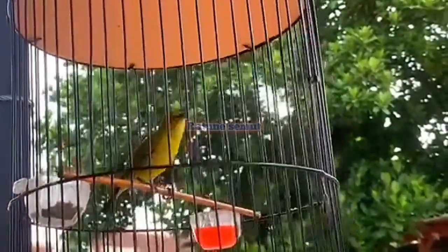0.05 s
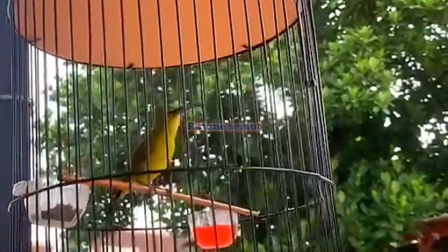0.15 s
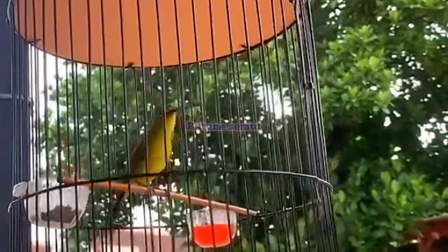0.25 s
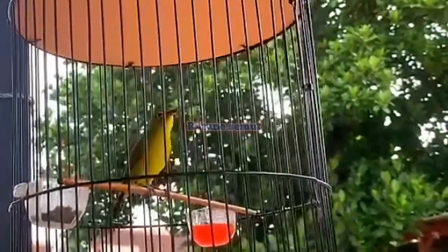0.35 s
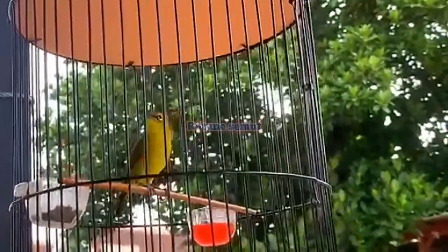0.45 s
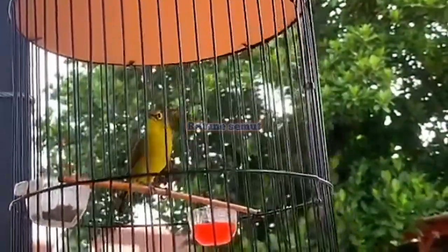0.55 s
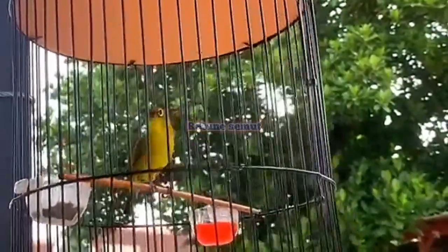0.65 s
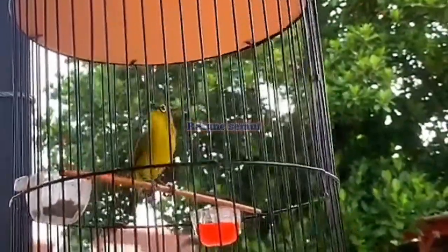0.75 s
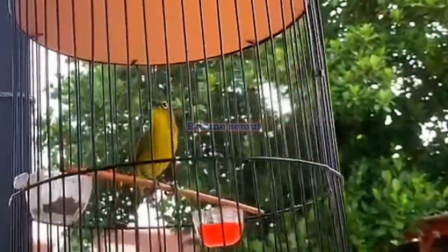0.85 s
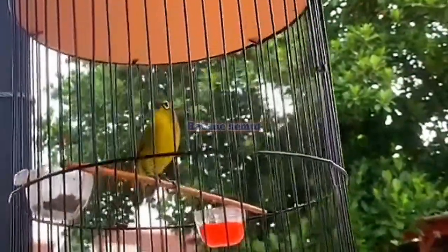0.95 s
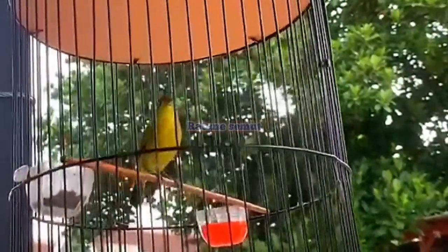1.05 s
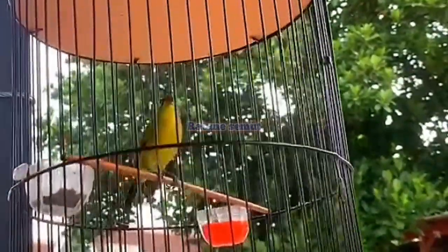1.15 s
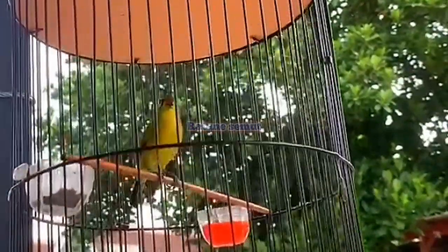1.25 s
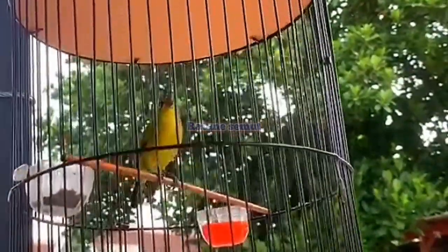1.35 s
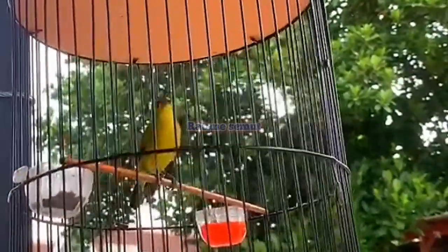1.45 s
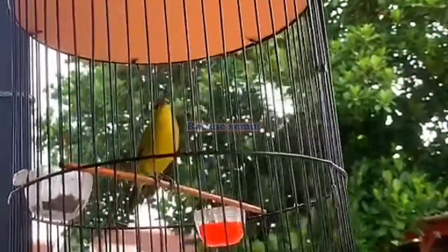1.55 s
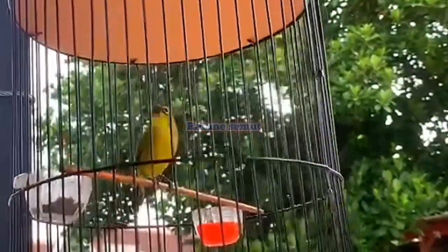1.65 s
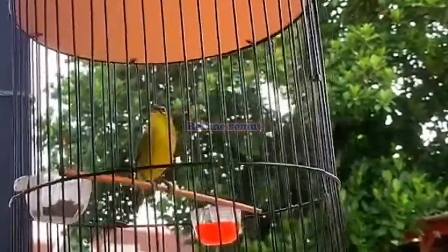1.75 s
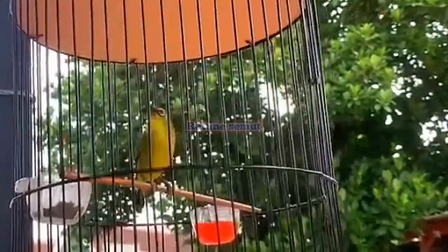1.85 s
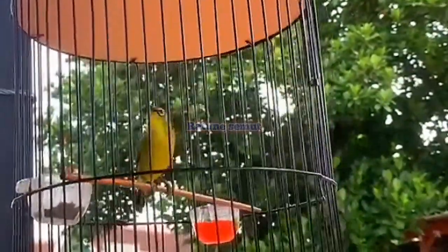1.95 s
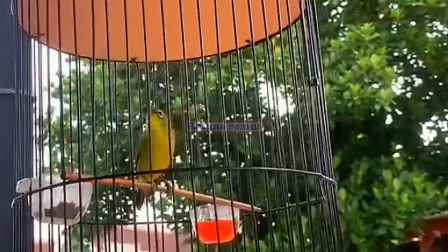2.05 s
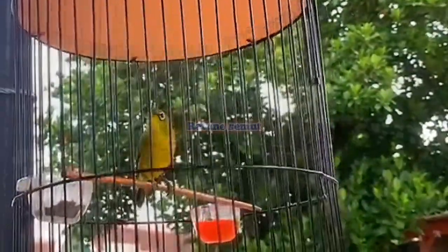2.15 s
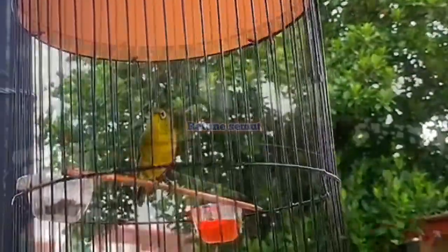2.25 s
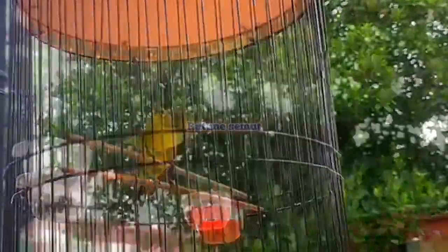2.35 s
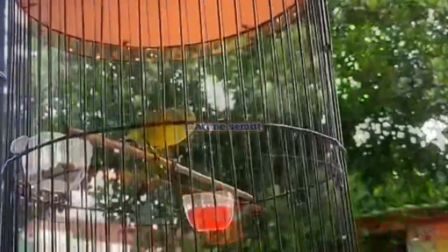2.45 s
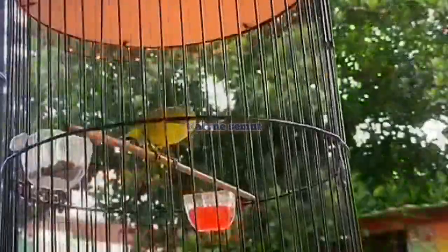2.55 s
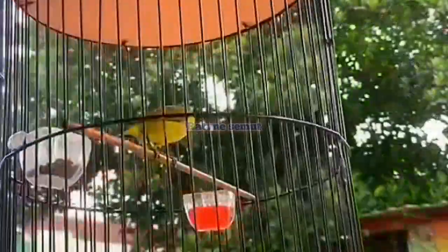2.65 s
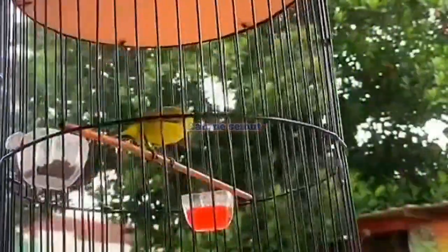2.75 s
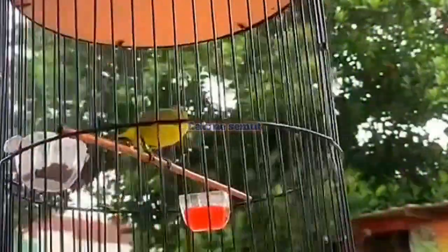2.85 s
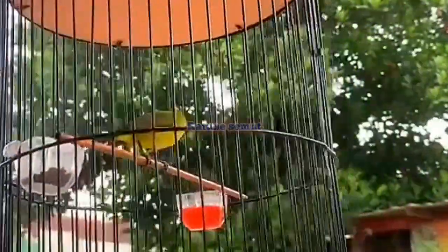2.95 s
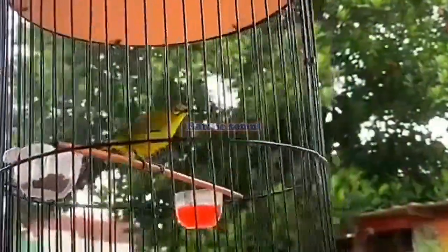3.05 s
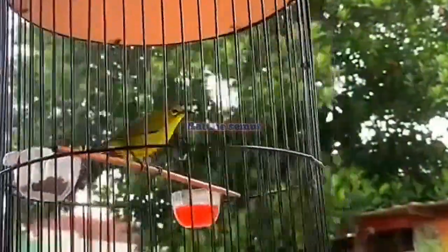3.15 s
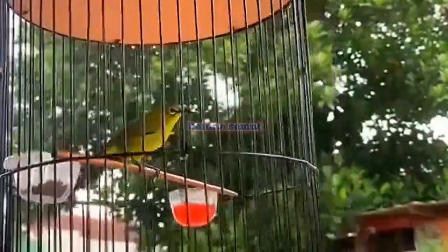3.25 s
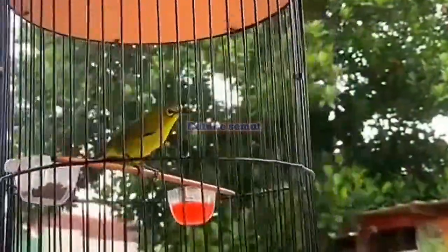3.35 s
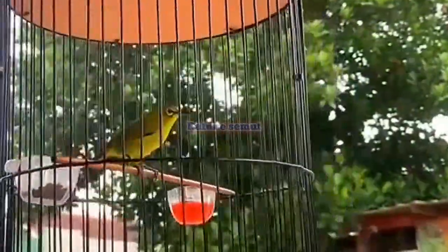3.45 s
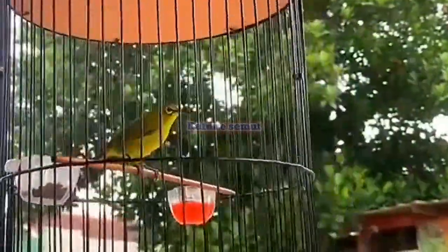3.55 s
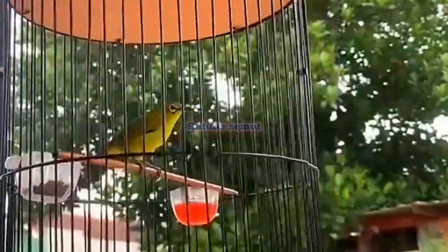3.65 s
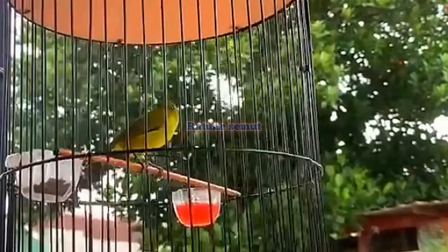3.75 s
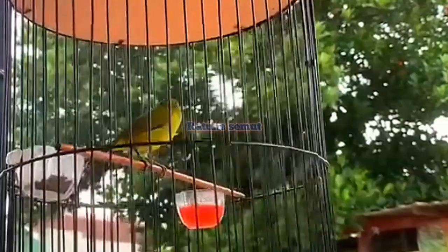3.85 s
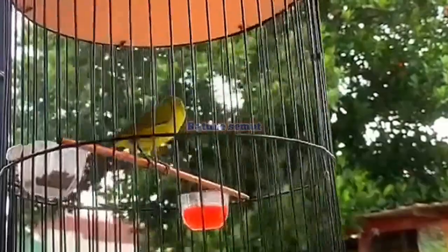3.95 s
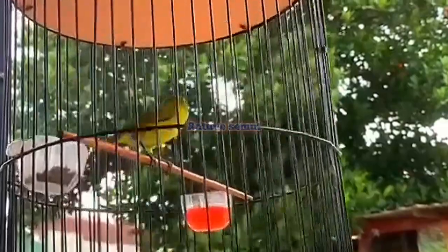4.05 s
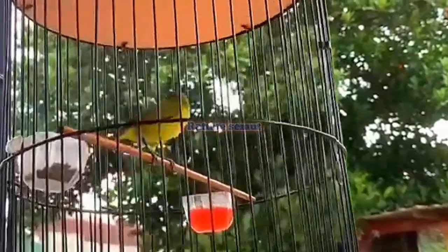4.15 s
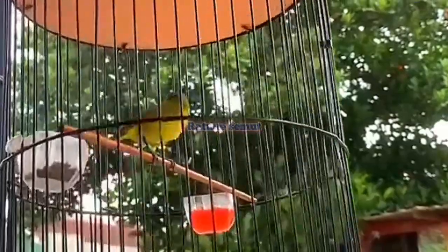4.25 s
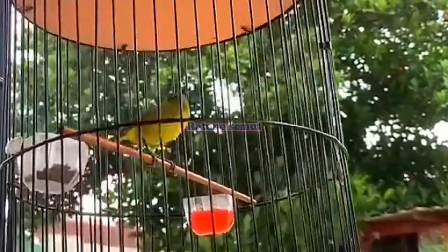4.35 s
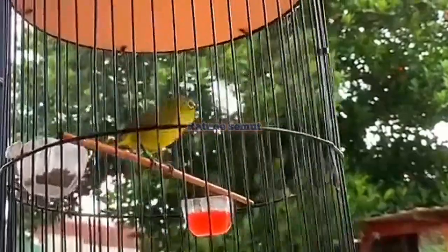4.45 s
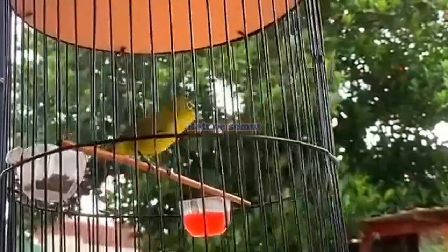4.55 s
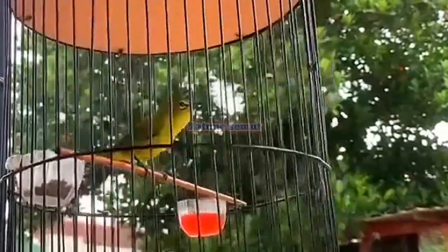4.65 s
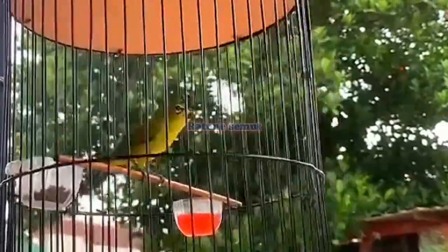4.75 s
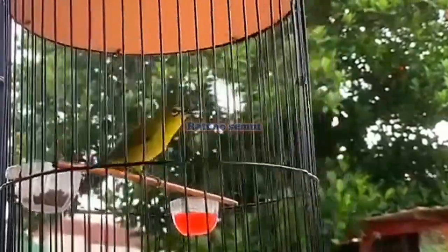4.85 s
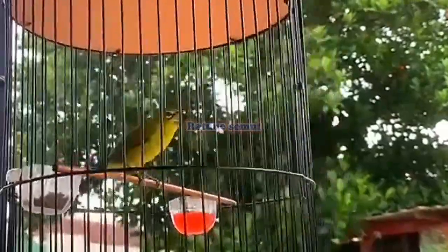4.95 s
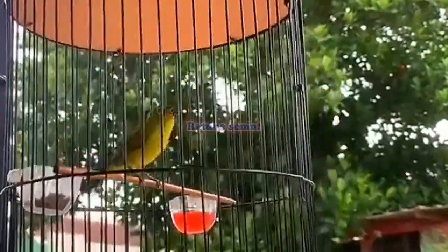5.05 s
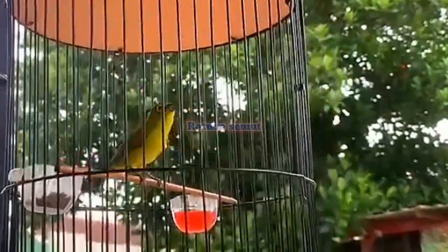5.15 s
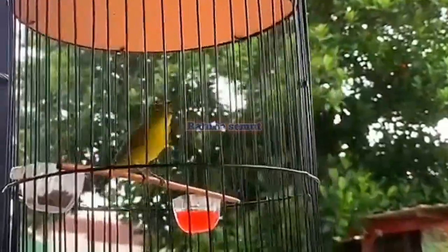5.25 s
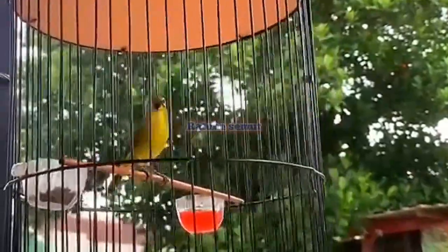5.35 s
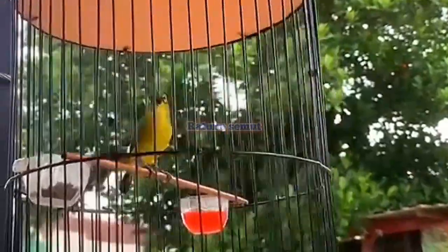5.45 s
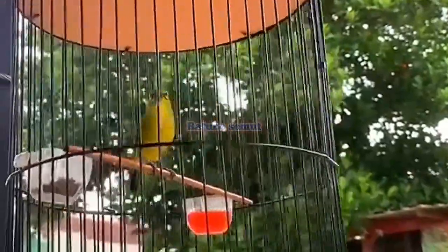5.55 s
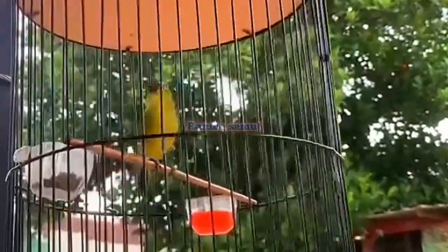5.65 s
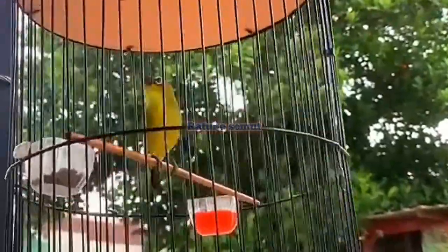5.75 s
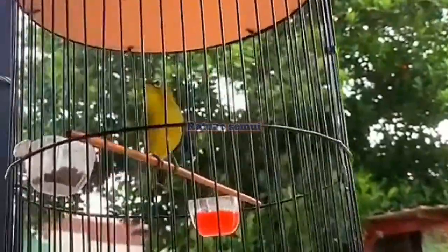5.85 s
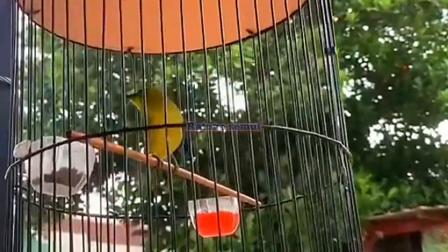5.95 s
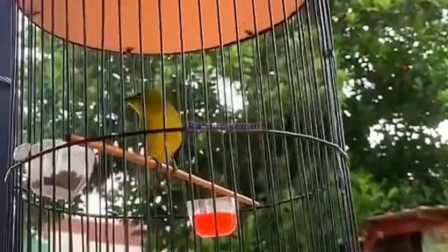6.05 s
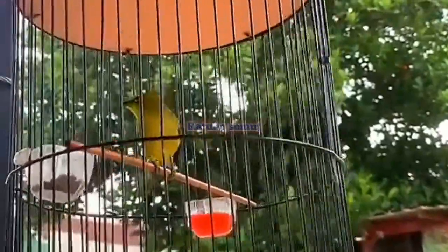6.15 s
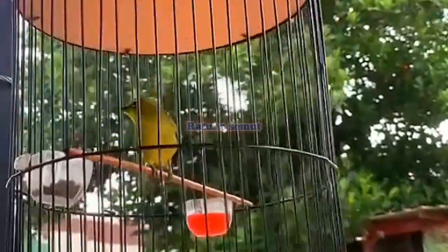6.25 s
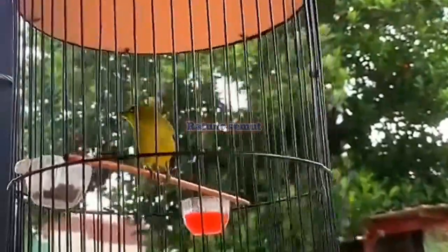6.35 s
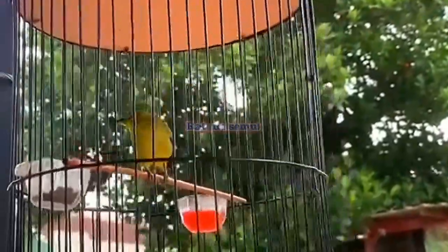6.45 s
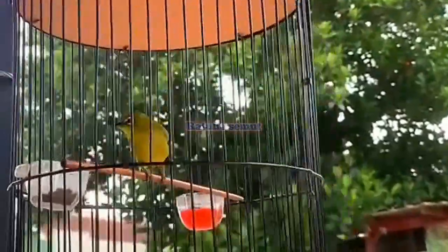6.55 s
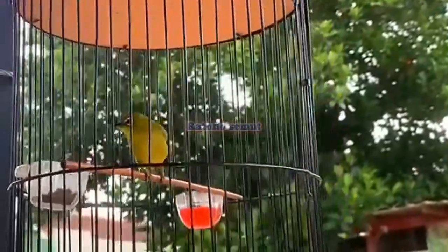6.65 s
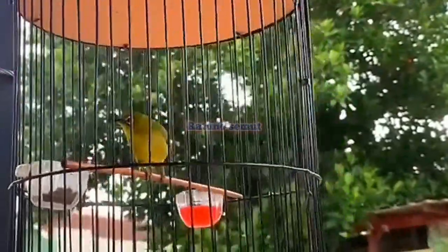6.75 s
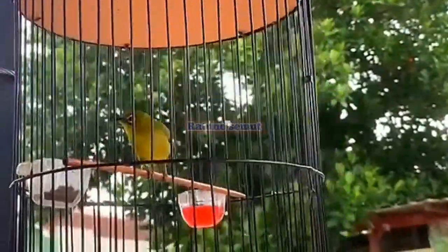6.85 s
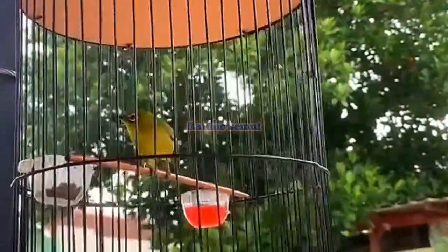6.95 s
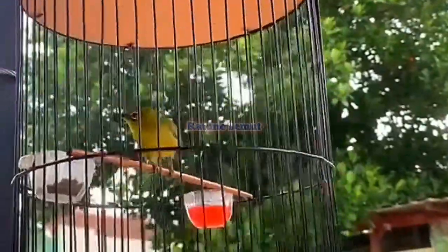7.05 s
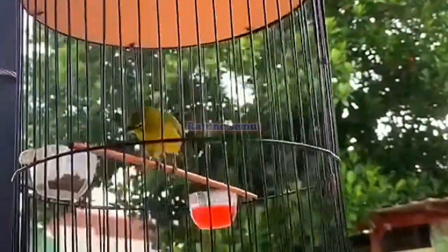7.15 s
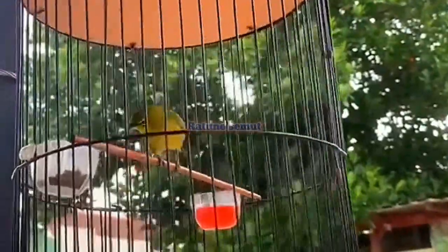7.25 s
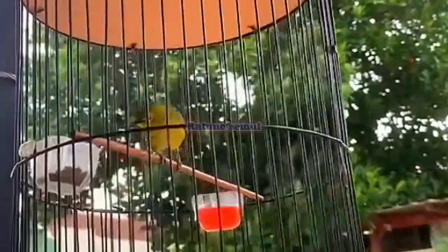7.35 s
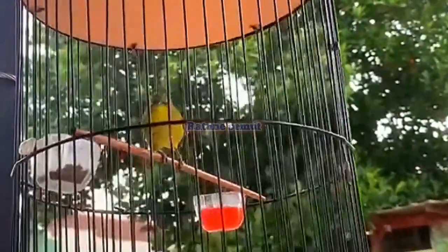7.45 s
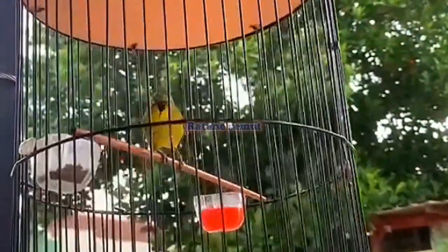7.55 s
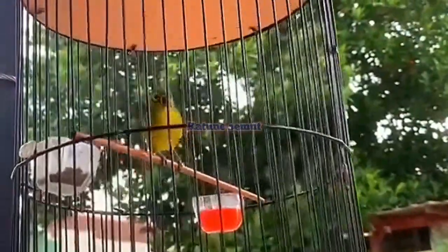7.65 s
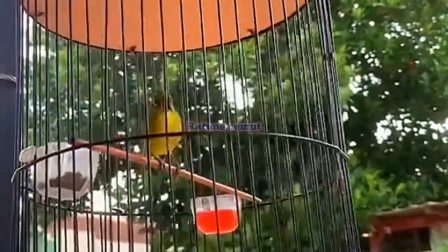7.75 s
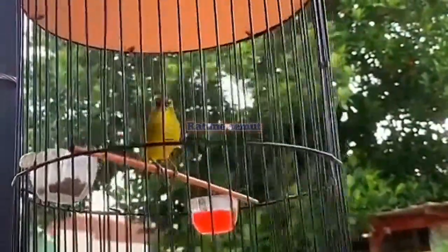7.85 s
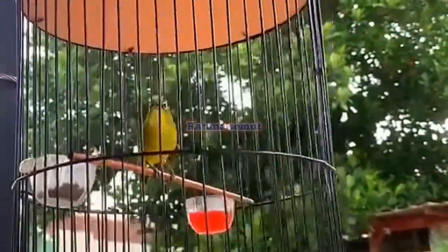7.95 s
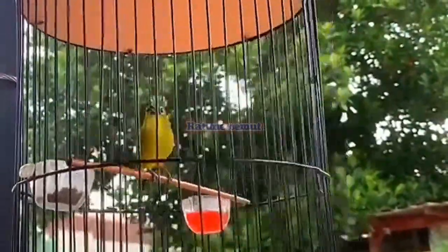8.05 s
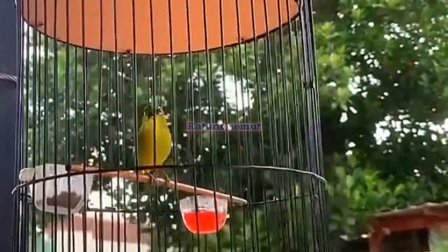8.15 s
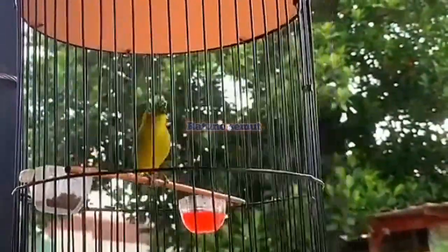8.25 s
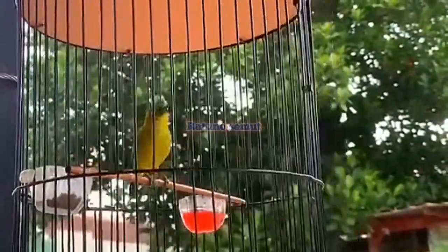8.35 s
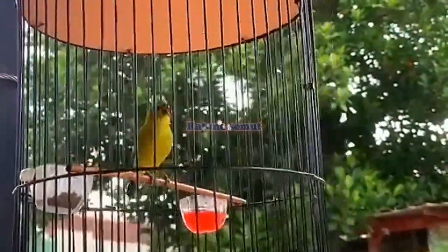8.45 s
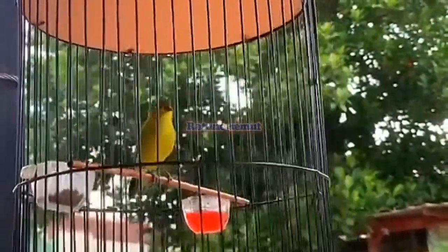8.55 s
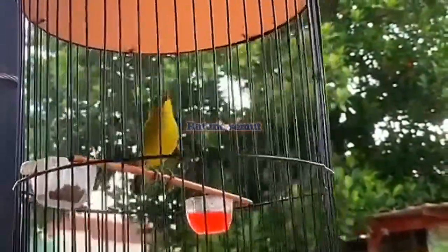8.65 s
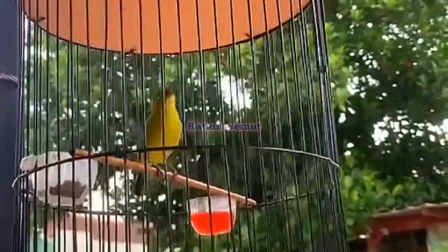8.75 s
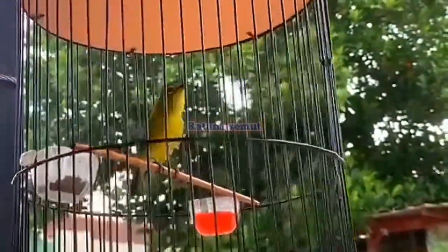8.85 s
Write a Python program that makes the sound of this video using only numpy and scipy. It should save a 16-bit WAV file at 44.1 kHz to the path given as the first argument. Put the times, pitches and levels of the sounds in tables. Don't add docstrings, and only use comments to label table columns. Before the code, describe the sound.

Piercing fast birdsong in separate bursts under a porch, with distant echoing replies, low garden chirps, passing road noise and brief gusts in leaves.

```python
import sys
import numpy as np
from scipy import signal
from scipy.fft import rfft, irfft
from scipy.io import wavfile
from scipy.ndimage import uniform_filter1d, minimum_filter1d

SR = 44100
rng = np.random.default_rng(int(sys.argv[2]) if len(sys.argv) > 2 else 0)


def unload_wav(signal):
    wavfile.write(
        sys.argv[1],
        SR,
        np.round(np.clip(np.atleast_2d(signal).T, -1, 1) * 32767).astype(np.int16),
    )


def voltage_ratio(decibels):
    exponent = np.asarray(decibels, float) / 20
    return 10 ** exponent


N = 392931


def shaped(x, points):
    hz, db = np.transpose(points)
    bins_hz = np.fft.rfftfreq(x.shape[-1], 1 / SR)
    gain_db = np.interp(np.log(bins_hz + 1), np.log(hz), db, -120, -120)
    return irfft(rfft(x) * voltage_ratio(gain_db), x.shape[-1])


def drift(span):
    x = uniform_filter1d(rng.standard_normal(N), size=span)
    x = uniform_filter1d(x, size=span)
    return x / x.std()


def rush(spectrum, patchy_db):
    z = signal.stft(rng.standard_normal(N + SR), nperseg=512)[2]
    patches = uniform_filter1d(rng.standard_normal(z.shape), size=4, axis=0)
    patches = uniform_filter1d(patches, size=10, axis=1)
    gain = voltage_ratio(patchy_db * patches / patches.std())
    noise = signal.istft(z * gain, nperseg=512)[1]
    x = shaped(noise, spectrum)[:N]
    return x / x.std()


def background():
    # (time [s], strength [dB])
    road_curve = [(0, -48.5), (1.9, -49), (2.5, -52.5), (2.85, -65.5), (8.91, -68.5)]
    # (time [s], strength [dB])
    wind_curve = [(0, -52.5), (.5, -64.5), (2.85, -66.5), (3.3, -58.5), (3.649, -46.5), (4.0, -51.5),
                  (4.17, -52.5), (4.22, -64), (4.84, -66.5), (4.91, -49.5), (5.04, -69.5), (7.02, -69.5),
                  (7.1, -50.5), (7.45, -45.5), (7.56, -48.5), (7.68, -65.5), (8.91, -70)]
    # (rumble [dB], traffic [dB], leaves [dB])
    road_drives = (-14, 0, -5.5)
    wind_drives = (-1.1, -4, 0)
    # (frequency [Hz], density [dB per Hz])
    rumble_spectrum = [(13, -42.5), (22, -9), (54, -1), (107, -4.5), (168, -9.5), (300, -12.5),
                       (390, -22.5), (660, -120)]
    traffic_spectrum = [(120, -32.5), (200, -6), (576, -2.5), (705, -3.5), (856, -7), (1200, -8.5),
                        (1560, -16), (2640, -120)]
    leaves_spectrum = [(900, -40), (1200, 0), (2000, -0.5), (3500, 0), (5000, -5.5), (7500, -16.5),
                       (9000, -25), (15500, -56.5)]
    hiss_spectrum = [(35, -14), (300, 4.5), (1000, -19.5), (1500, -2), (5000, -8), (8500, -10.5),
                     (10000, -30.5), (15500, -25)]
    t = np.arange(N) / SR
    road = voltage_ratio(np.interp(t, *np.transpose(road_curve)))
    wind = voltage_ratio(np.interp(t, *np.transpose(wind_curve)))
    rumble, traffic, leaves = (np.hypot(voltage_ratio(road_db) * road, voltage_ratio(wind_db) * wind)
                               for road_db, wind_db in zip(road_drives, wind_drives))
    low = rumble * rush(rumble_spectrum, patchy_db=3.5) + traffic * rush(traffic_spectrum, patchy_db=1.5)
    rustle = voltage_ratio(9.5) * leaves * rush(leaves_spectrum, patchy_db=4.0)
    return low + rustle + voltage_ratio(-62.0) * rush(hiss_spectrum, patchy_db=6.5)


def sung(shape, rows):
    return [[(s + u * length, low + height * (top - low), db + effort_db) for u, height, effort_db in shape]
            for s, length, low, top, db in rows]


def whistle(notes, edge_s, waver, undertone_db):
    # (multiple of the pitch [1], level [dB], rise [dB per octave of pitch])
    partials = [(1.5, -55.5, 14.5), (2, -43, 12), (3, -63, -3.5)]
    out = np.zeros(N)
    wander = drift(span=150)
    patchy = voltage_ratio(7.0 * drift(span=70))
    broken = voltage_ratio(7.04 * drift(span=900))
    for note, under_db in zip(notes, np.resize(undertone_db, len(notes))):
        s, hz, db = np.transpose(note)
        at = np.arange(max(round(s[0] * SR), 0), min(round(s[-1] * SR), N))
        t = at / SR
        pitch = uniform_filter1d(np.interp(t, s, hz), size=200, mode="nearest")
        pitch = pitch * (1 + waver * wander[at])
        phase = 2 * np.pi * np.cumsum(pitch) / SR
        octaves = np.log2(pitch / 6000)
        undertone = voltage_ratio(under_db + 2 + 29.5 * octaves) * broken[at] * np.sin(phase / 2)
        weak = 0
        for k, strength_db, rise in partials:
            audible = k * pitch < SR / 2
            weak = weak + voltage_ratio(strength_db + rise * octaves) * np.sin(k * phase) * audible
        tone = np.sin(phase) + undertone + patchy[at] * weak
        edge = np.clip(np.minimum(t - s[0], s[-1] - t) / edge_s, 0, 1)
        out[at] += np.sqrt(2) * np.interp(t, s, voltage_ratio(db)) * edge * tone
    return out


def echoes(x, tails, delay_s):
    # (frequency [Hz], gain [dB])
    walls = [(1500, 5.5), (3200, -14), (3800, -6), (4500, -7.5), (5600, 3), (7000, -8.5), (9000, 2.5),
             (16000, -26.5)]
    t = np.arange(SR) / SR
    answer = np.zeros(SR)
    for t60, db in tails:
        noise = shaped(rng.standard_normal(SR), walls)
        decay = voltage_ratio(-60 * t / t60) * (t > delay_s)
        answer += voltage_ratio(db + 4.0) * noise * decay / np.linalg.norm(decay) / noise.std()
    return signal.fftconvolve(x, answer)[:N]


def neighbours():
    # (time [s], length [s], first pitch [Hz], last pitch [Hz], level [dB])
    reply_notes = [(2.299, .15, 6400, 5240, -56.5), (2.47, .15, 7040, 5240, -53),
                   (2.675, 0.079, 5390, 5410, -57), (2.898, 0.15, 7240, 4920, -49),
                   (3.101, .18, 6630, 5076, -43.5), (3.223, 0.2, 3620, 4100, -44.5),
                   (3.302, 0.15, 4820, 6520, -45), (3.453, 0.11, 5870, 5694, -42),
                   (3.633, 0.06, 4910, 5200, -40.5), (3.713, 0.088, 7270, 5070, -43),
                   (3.866, 0.08, 7000, 4970, -42.5), (5.947, 0.068, 5180, 5200, -54.5),
                   (6.131, 0.22, 6980, 5230, -50.5), (6.198, .1, 6650, 4640, -53.5),
                   (6.379, .18, 6030, 5470, -52), (6.397, .15, 7200, 3900, -50.5),
                   (6.554, 0.073, 6190, 6500, -51), (6.647, 0.21, 4050, 2830, -57.5),
                   (7.032, .17, 6750, 5340, -41.5), (7.182, 0.11, 6870, 6300, -43),
                   (7.228, 0.14, 6000, 4100, -42), (7.4, 0.13, 3970, 5770, -38)]
    # (share of length [0-1], share of the way to last pitch [0-1], effort [dB])
    glide = [(0, 0, -2), (.35, .6, -1.5), (1, .99, -4.5)]
    # (time [s], level [dB],
    # length [s], top pitch [Hz])
    chirp_notes = [(0.046, -46, .08, 2560), (0.186, -46.5, .07, 2520), (0.323, -44, 0.072, 2530),
                   (0.445, -46, 0.094, 2424), (1.923, -40, 0.029, 2760), (2.55, -55, 0.042, 2485),
                   (2.645, -46, 0.044, 2565), (2.743, -40.5, 0.0595, 2615), (2.852, -40, 0.052, 2550),
                   (2.966, -40.5, 0.0492, 2448), (3.087, -43.5, 0.075, 2576), (3.234, -40.5, 0.08, 2534),
                   (7.841, -39, .04, 3616), (8.599, -50, 0.092, 2620), (8.705, -52.5, 0.095, 2610),
                   (8.775, -56, 0.059, 2550)]
    # (share of length [0-1], pitch as share of top [0-1], level [dB])
    chirp_shape = [(0, .8, -30.5), (0.121, 0.77, -1.5), (.25, 0.98, 10.5), (.7, 0.92, -8), (1, .92, -10)]
    # (decay time t60 [s], level [dB])
    garden = [(.22, 3), (.5, 0), (1.2, -8)]
    chirps = [[(s + u * length, share * hz, db + shape_db) for u, share, shape_db in chirp_shape]
              for s, db, length, hz in chirp_notes]
    replies = whistle(sung(glide, reply_notes), edge_s=0.0063, waver=.035, undertone_db=[-60])
    low_bird = whistle(chirps, edge_s=0.011, waver=0.021, undertone_db=[-60])
    calls = voltage_ratio(-5.0) * replies + voltage_ratio(-7.5) * low_bird
    direct_db = -8
    return voltage_ratio(direct_db) * calls + echoes(calls, garden, delay_s=0.0026)


def singer():
    # (share of length [0-1], height between low and top pitch [0-1], effort [dB])
    rise = [(0, 0, -12.5), (.12, .3, -3), (.35, .58, -5), (.62, .87, 0), (.8, .98, -5.5), (1, 0.92, -9)]
    held_rise = [(0, 0, -14.5), (.1, .32, -4.5), (.3, .7, -5.5), (.48, 0.93, -1), (.62, .99, -5.5),
                 (.9, .9, -2), (1, .87, -7)]
    climb = [(0, 0.03, -24.5), (.09, .14, -2), (.2, .2, 0), (.36, .55, -9.5), (.52, .62, 0),
             (.78, 0.93, -3), (1, 0.94, -8.5)]
    stair = [(0, .98, -24), (.12, .9, -14.5), (.24, .55, -5.5), (.33, .4, -3.5), (.52, 0.44, -4),
             (.68, .28, -1.5), (.92, 0.09, -5), (1, 0, -13.5)]
    long_stair = [(0, .99, -19.5), (.08, .9, -24.5), (.22, .36, -3.5), (.27, .42, -1), (.42, .4, -5.5),
                  (.62, .2, -2.5), (.94, 0.049, -5), (1, 0, -27)]
    step_down = [(0, 0.96, -36.5), (.15, .58, -3.5), (.53, .53, -1), (.64, .31, 1), (.88, .3, -4.5),
                 (1, 0.041, -34.5)]
    terrace = [(0, .99, -23), (.12, .82, -11), (.3, .72, -5), (.53, 0.38, -1), (.92, .12, -2),
               (1, 0.033, -26)]
    slide = [(0, .93, -17), (.08, .99, -5), (.16, .88, -2.5), (.29, .48, -1), (.5, .36, -1), (.92, .1, -4),
             (1, 0, -17.5)]
    kinked_slide = [(0, .95, -15.5), (.2, 0.97, -7.5), (.28, .72, -0.5), (.38, .8, -1), (.56, .4, -4),
                    (1, 0.028, -16.5)]
    swoop = [(0, 1, -31), (.1, 0.98, -13.5), (.3, .7, -10.5), (.47, .5, -1), (.74, .31, -1), (.93, .21, -5),
             (1, 0, -27.5)]
    dive = [(0, 0.97, -19), (.3, .6, -1), (.9, .08, -1.5), (1, 0.016, -5)]
    arch = [(0, .3, -19.5), (.38, 0.97, 1.5), (.72, .8, -8.5), (1, 0, -29)]
    led_arch = [(0, .55, -15), (.18, 0.69, -7), (.35, 0.34, -7.5), (.5, 0.92, -0.5), (.67, .47, -1.5),
                (.84, 0.12, -9.5), (1, 0, -16)]
    flat = [(0, 0, -16.5), (.1, .75, -2), (.3, .65, -0.5), (.85, .99, -0.5), (1, .4, -10)]
    warble = [(0, .99, -25), (.13, .86, -3.5), (.3, .6, -3.5), (.5, .3, -1.5), (.6, .52, -19),
              (.69, .22, 0), (.79, 0.29, -17.5), (.89, 0.18, -0.5), (1, 0, -16)]
    # (time [s], length [s], low pitch [Hz], top pitch [Hz], level [dB])
    rises = [(5.198, 0.073, 3360, 6083, -12), (5.292, 0.067, 3374, 5885, -11),
             (5.384, 0.066, 3387, 5946, -11), (5.481, 0.071, 3350, 5930, -10.5),
             (5.59, .074, 3280, 5950, -11.5), (5.709, 0.069, 3346, 6257, -13)]
    held_rises = [(-.07, 0.091, 3700, 5804, -12.5), (7.95, .09, 3900, 6044, -10.5),
                  (8.088, 0.089, 3620, 5773, -9), (8.224, 0.094, 3600, 5892, -11.5),
                  (8.365, .09, 3600, 5737, -11.5), (8.508, 0.092, 3700, 5725, -12.5)]
    climbs = [(4.487, .102, 3388, 6320, -10.5), (4.641, .108, 3210, 5808, -11.5)]
    stairs = [(1.177, .124, 4407, 8130, -12), (1.592, 0.15, 4330, 8340, -13)]
    long_stairs = [(.555, .178, 4285, 8320, -10.5)]
    steps_down = [(4.327, .107, 4246, 7950, -13)]
    terraces = [(.945, .169, 4210, 7845, -12.5), (4.122, 0.15, 4436, 8444, -10.5)]
    slides = [(1.35, .153, 3766, 6737, -12.5), (1.795, .165, 3620, 6747, -13.5)]
    kinked_slides = [(7.736, .149, 4030, 7106, -12)]
    swoops = [(4.925, .142, 4580, 7820, -12.5), (7.512, .172, 4848, 8415, -8)]
    dives = [(2.008, .08, 3210, 8030, -30.5), (2.144, .076, 3090, 7860, -23)]
    arches = [(0.777, 0.039, 3000, 5210, -15), (.849, .031, 3217, 5200, -13)]
    led_arches = [(5.105, .055, 3180, 4940, -14.5)]
    flats = [(.062, .073, 3337, 3817, -10), (8.644, 0.072, 3390, 3926, -11)]
    warbles = [(.163, .109, 2880, 5074, -8), (8.745, .119, 2750, 5000, -10.5)]
    # (shape, notes, half-pitch undertone [dB])
    repertoire = [(rise, rises, -39), (held_rise, held_rises, -35), (climb, climbs, -42),
                  (stair, stairs, -39), (long_stair, long_stairs, -38), (step_down, steps_down, -45),
                  (terrace, terraces, -38.5), (slide, slides, -33.5), (kinked_slide, kinked_slides, -33.5),
                  (swoop, swoops, -37.5), (dive, dives, -46), (arch, arches, -27),
                  (led_arch, led_arches, -61), (flat, flats, -48), (warble, warbles, -38)]
    # (decay time t60 [s], level [dB])
    porch = [(0.038, -8.5), (.25, -15), (1.198, -35.5)]
    # (frequency [Hz], density [dB per Hz])
    rasp = [(6500, -6), (8500, -9.5), (10000, 16.5), (12000, -10), (15000, 1.5), (15700, -6)]
    notes = [note for shape, rows, _ in repertoire for note in sung(shape, rows)]
    under_db = [db for _, rows, db in repertoire for row in rows]
    flutter = voltage_ratio(-1.5 + 2.36 * drift(span=120))
    song = flutter * whistle(notes, edge_s=.003, waver=.009, undertone_db=under_db)
    effort = np.sqrt(np.abs(uniform_filter1d(song ** 2, size=300)))
    haze = voltage_ratio(-46.0) * effort * rush(rasp, patchy_db=7)
    return song + echoes(song, porch, delay_s=0.00096) + haze


def scene():
    return (singer() + neighbours() + background())[None]


def limit(x, top):
    need = np.minimum(1, top / (np.abs(x) + 1e-9))
    return x * uniform_filter1d(minimum_filter1d(need, size=200), size=100)


def roll_off(x):
    return signal.sosfilt(signal.butter(12, 16180, fs=SR, output="sos"), x)


def record(dry):
    # (frequency [Hz], gain [dB])
    bend = [(30, -11), (60, -5), (200, -1.5), (700, -4.5), (6000, -22), (8500, -14.5), (10500, -19),
            (13500, -7), (15500, -14.5)]
    # (frequency [Hz], gain [dB])
    passband = [(15, -24), (40, 0), (15750, 0)]
    x = limit(dry[0], top=.88)
    bent = x + voltage_ratio(-22.0) * shaped(x ** 2, bend) - voltage_ratio(-22.0) * x ** 3
    mix = shaped(bent, passband)[None]
    return roll_off(mix)


dry = scene()
out = record(dry)
unload_wav(out)
```